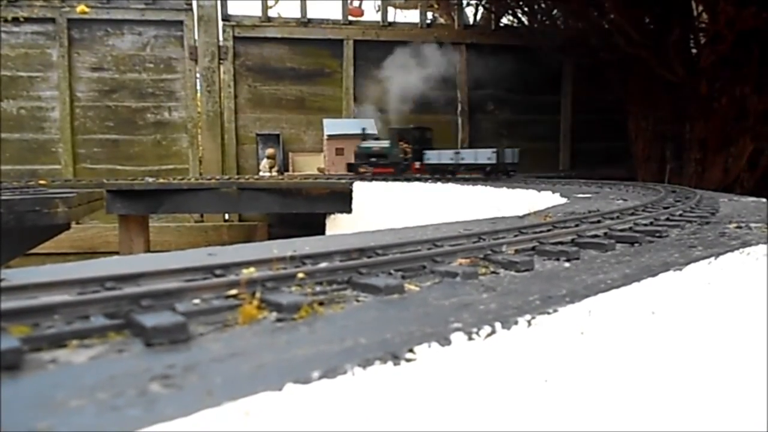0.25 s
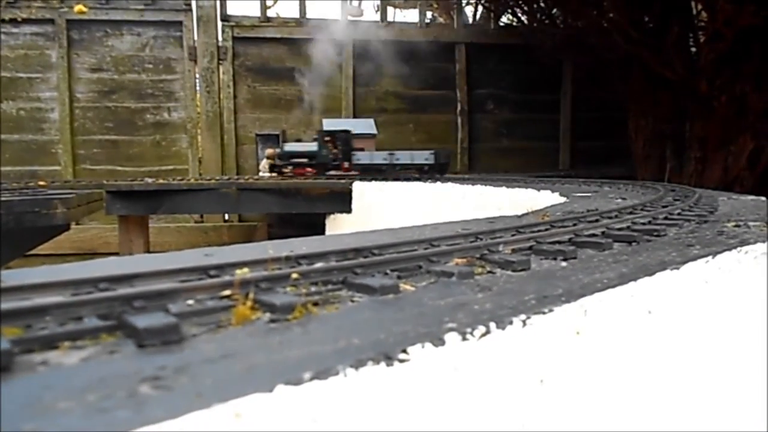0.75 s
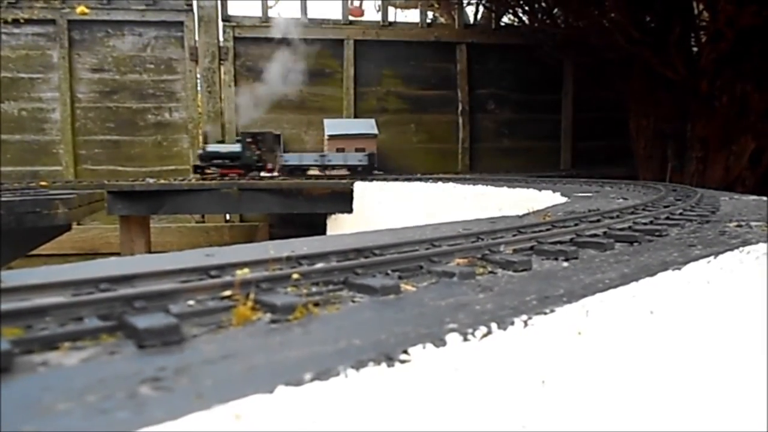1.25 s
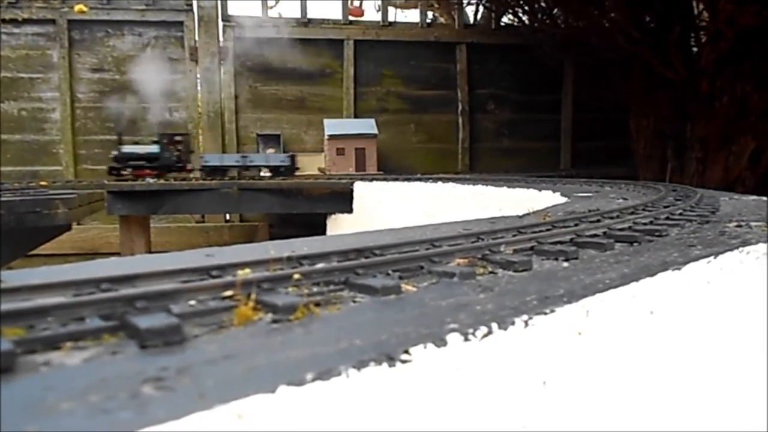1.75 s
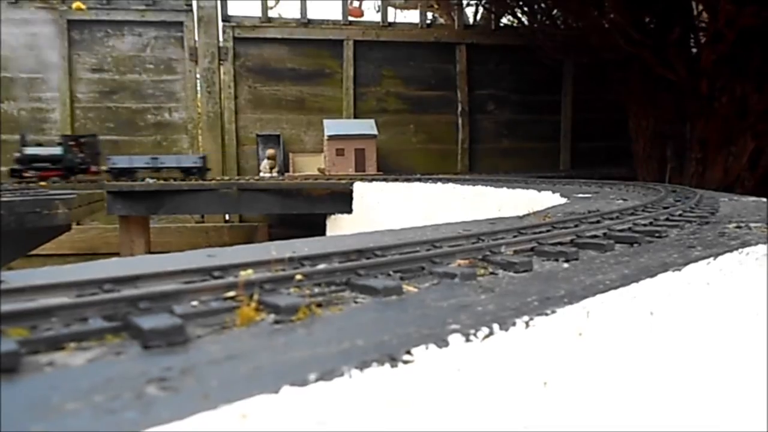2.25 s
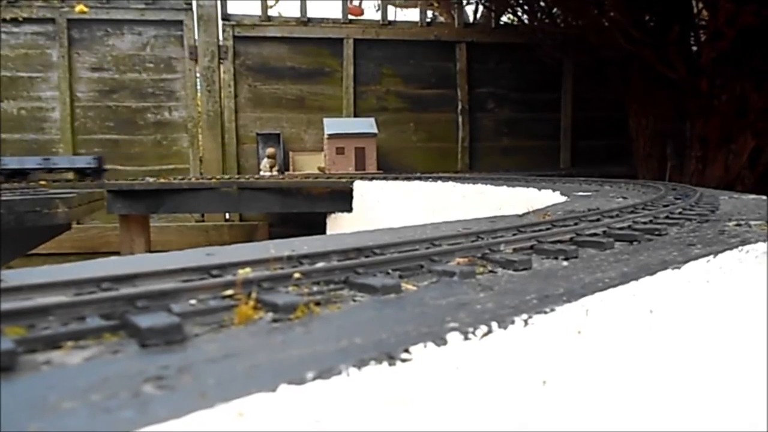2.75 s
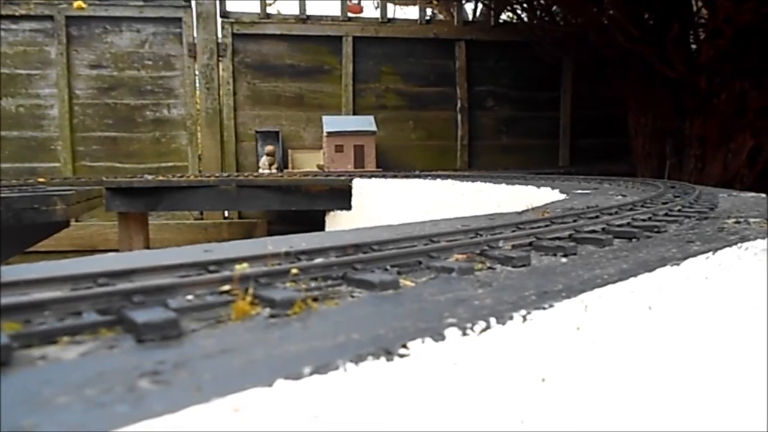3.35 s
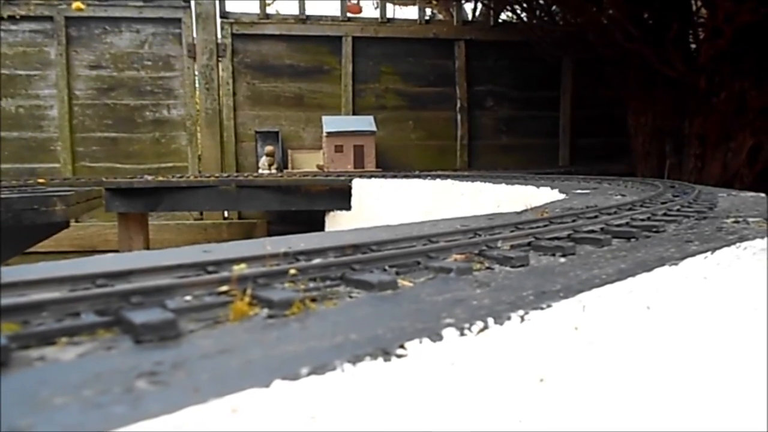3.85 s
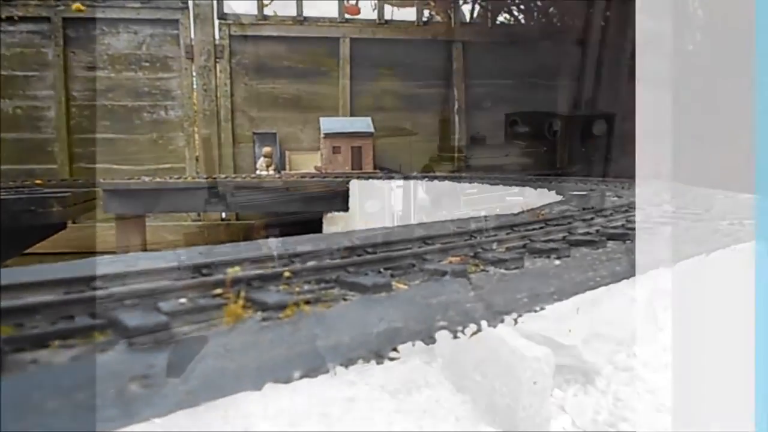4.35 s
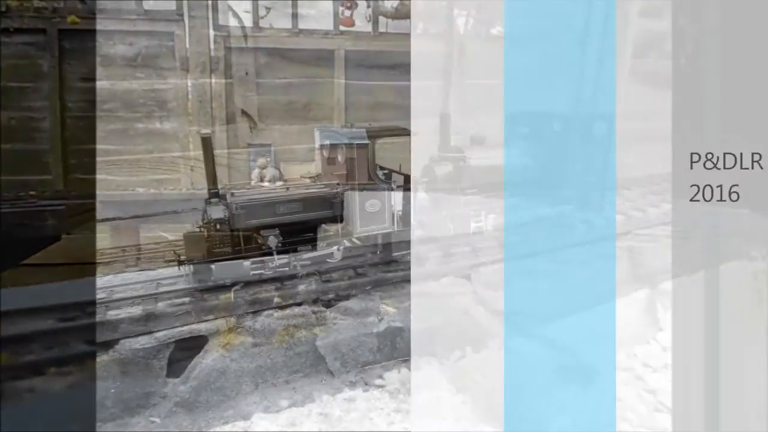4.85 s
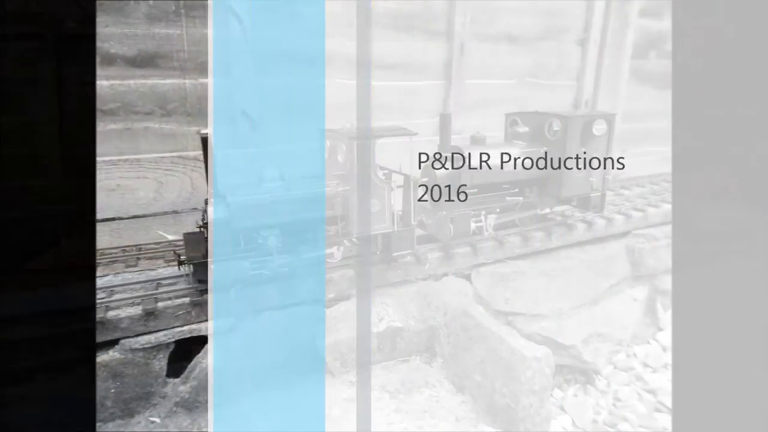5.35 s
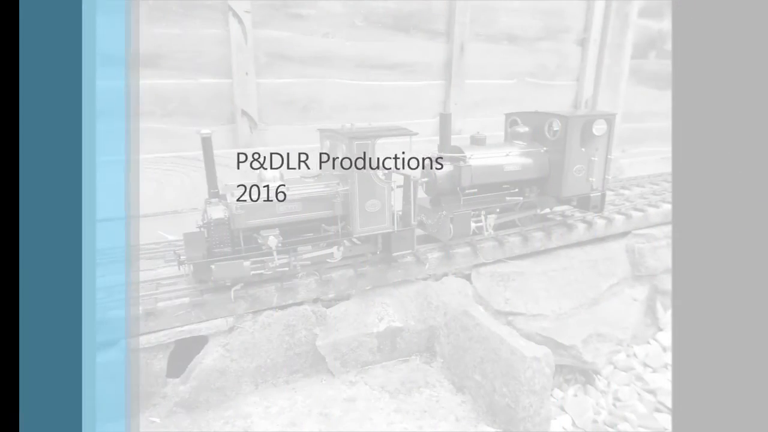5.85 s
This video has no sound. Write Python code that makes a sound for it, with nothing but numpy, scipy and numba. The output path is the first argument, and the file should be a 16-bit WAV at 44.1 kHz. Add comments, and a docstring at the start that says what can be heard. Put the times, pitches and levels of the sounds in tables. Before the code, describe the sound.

A small steam locomotive and wagon run along a garden railway, heard from beside the track as a steady, slightly hollow hiss over rumbling wheels. Hard wind gusts thump on the microphone in the first 0.3 seconds, and the train dips in level, then recovers. Light, regular knocks tick through the first second and return near 1.7 seconds. Softer low buffeting continues, with faint, brief wheel scrapes from about 1 second on. Another gust hits at 2.2 seconds, among a few brighter wheel clicks lasting until 2.7. Strong gusts come between 2.8 and 3.4 seconds, ducking the train again, with a smaller one at 4.2. The rumble then grows as the hiss carries on. A coupling clinks lightly at 4.8 seconds, the wheels drum hollowly at 5.2, and a sharper clink follows at 5.4. Everything stops abruptly at about 5.5 seconds.

```python
"""Hissing steam and rumbling wheels, buffeted by wind, at a microphone beside a garden railway.
A small live-steam locomotive pulls a wagon round: its blast rings the chimney, and the wheels roar
on the baseboard, tick on the track and scrape in the curve. Gusts thump on the microphone;
the train's level dips after the hardest ones, and all sound stops abruptly."""
import sys
import numpy as np
from scipy import signal
from scipy.fft import rfft, irfft, next_fast_len
from scipy.io import wavfile
from scipy.ndimage import uniform_filter1d
from numba import njit

SR = 44100
rng = np.random.default_rng(int(sys.argv[2]) if len(sys.argv) > 2 else 0)


def materialize(psi):
    """Save the field psi as 16-bit PCM at rate SR to the path in sys.argv[1].

    A 1-D psi becomes a single channel; in a 2-D psi each row is a channel.
    """
    bounded = np.clip(np.atleast_2d(psi).T, -1, 1)
    quanta = np.round(bounded * 32767).astype(np.int16)
    wavfile.write(sys.argv[1], SR, quanta)


N = 269449
TIME = np.arange(N) / SR

# gusts at the microphone:
# (time [s], length [s], relative slow swing [dB], relative turbulence [dB], top pitch [Hz])
GUSTS = [(0.049, 0.065, -20, -17, 374), (0.173, 0.045, -15.5, -13, 456), (0.288, 0.085, -26, -24, 200),
         (.78, .18, -30.5, -40, 109), (1.204, 0.097, -18, -31, 100), (1.41, 0.13, -15.5, -28, 100),
         (2.199, 0.084, -14.5, -17, 290), (2.83, 0.21, -14, -33, 119), (2.968, 0.044, -32, -16, 357),
         (3.082, 0.08, -24, -17, 346), (3.205, .008, -25, -24, 435), (3.279, 0.016, -15, -22.5, 590),
         (3.375, 0.056, -25, -22.5, 298), (3.618, 0.058, -23.5, -26, 150), (4.188, 0.13, -19, -18.5, 145)]


def steam(beat_hz=31.1, beat_depth=0.028, flicker_db=1.15, chimney_hz=1154, sag_hz_per_s=19):
    """A hiss with soft exhaust beats, four a wheel turn; the blast rings the chimney and the boiler."""
    # spectrum of the hiss: (frequency [Hz], relative level [dB])
    hiss_spectrum = [(500, -19.5), (1400, 5.5), (2200, 0.5), (3000, -1), (3700, 2), (4500, 5.5),
                     (5300, 4.5), (6100, 2), (7600, 1), (8400, 2), (9100, 2.5), (10100, 4), (10600, -6),
                     (11200, -32)]
    # strength of the blast up the chimney: (time [s], level over the hiss [dB])
    blast = [(0, -6), (.7, 1), (1.1, 3.5), (1.5, -0.5), (2.0, 0.5), (2.8, -1.5), (4.1, -1.5), (5.0, 2.5),
             (5.46, -0.5)]
    # the boiler's hollow note: (pitch [Hz], width [Hz], level relative to the chimney [dB])
    boiler_mode = (430, 65, -6)
    blast_db, = curves(blast)
    beat_count = np.cumsum(beat_hz * (1 + 0.12 * walk(4.1))) / SR
    beats = (1 + beat_depth * np.cos(2 * np.pi * beat_count)) * undb(flicker_db * walk(90))
    sinking_hz = chimney_hz - sag_hz_per_s * TIME
    chimney = even(ring(ring(noise(), sinking_hz, 105), sinking_hz, 400), 0.39)
    hz, width, db = boiler_mode
    boiler = undb(db) * even(resonance(noise(), hz, width), 0.12)
    return beats * (colour(noise(), hiss_spectrum) + undb(blast_db) * (chimney + boiler))


def rolling(rattle_db=0.55):
    """Rough wheels on rough rails: dense tiny impacts that the baseboard turns into a roar."""
    # spectrum of the roar: (frequency [Hz], relative level [dB])
    roar_spectrum = [(60, -8), (190, -0.5), (300, 0.5), (420, 0.5), (500, -0.5), (590, 0.5), (740, -4),
                     (950, -0.5), (1150, -9), (1330, -11), (1880, -13), (2120, -18), (2900, -15),
                     (5000, -23), (10000, -36)]
    # the roar grows as the train comes round: (time [s], level over the hiss [dB])
    roar_levels = [(0, 4.5), (1.3, 6), (2.0, 3.5), (2.4, 6.5), (4.1, 7.5), (5.46, 13)]
    roar_db, = curves(roar_levels)
    contact = grit(9000, 0.72) * undb(rattle_db * walk(70))
    return undb(roar_db) * even(colour(contact, roar_spectrum), 0.1)


def sizzle(s=1.2, length_s=0.24, db=-40, hz=5200, width_hz=330, rise_per_s=0.21):
    """For a moment the hiss takes on a narrow, slightly rising edge."""
    centre_hz = hz * np.exp(rise_per_s * np.clip(TIME - s, -0.5, 0.5))
    return undb(db) * swell(s, length_s) * unit(resonance(noise(), centre_hz, width_hz))


def drumming(s=5.21, length_s=0.12, db=-22.5):
    """The wheels cross a hollow stretch and the baseboard booms."""
    # low modes of the board: (pitch [Hz], width [Hz], relative level [dB])
    board_modes = [(305, 61, -12), (477, 46, -1.5), (594, 54, -2)]
    contact = grit(6700, 0.93)
    boom = sum(undb(mode_db) * resonance(contact, hz, width) for hz, width, mode_db in board_modes)
    return undb(db) * swell(s, length_s) * even(boom, 0.074)


def flanges(rub_db=-44, rub_low_db=-5, waver_db=3):
    """Flanges stick and slip on the outer rail and sing in two broad modes: a rub, and harder scrapes."""
    # scrapes: (time [s], length [s], high mode level [dB], low mode relative to it [dB])
    scrapes = [(1.084, 0.041, -38.5, -21), (1.473, 0.044, -35.5, 0.5), (1.768, 0.048, -31, -8),
               (1.837, 0.071, -35.5, 2), (1.967, 0.011, -35, -1), (2.09, 0.069, -45.5, 1),
               (2.766, 0.06, -36.5, -11), (3.46, 0.016, -31, -12), (4.22, 0.1, -39, 0.5),
               (4.752, 0.073, -32, -9)]
    slip = grit(9000, 1) * undb(3 * walk(100))
    low = even(resonance(slip, hz=3096, width=350), 0.047)
    high = even(resonance(slip, hz=9220, width=1000), 0.047)
    rub = undb(rub_db + waver_db * walk(12)) * (high + undb(rub_low_db) * low)
    return rub + sum(undb(db) * swell(s, length) * (high + undb(low_db) * low)
                     for s, length, db, low_db in scrapes)


def rod_knocks(slowing_per_turn=0.0073):
    """A rod knocks once a turn as the wheels slow in the curve: (time [s], relative peak [dB])."""
    # spells of knocking: (start [s], end [s], turn [s], first relative peak [dB], growth [dB/turn])
    spells = [(.071, .9, .1215, -31, .9), (1.701, 2.03, .1305, -29, -1.7)]
    return [(start + k * turn_s * (1 + slowing_per_turn * k), db + k * growth_db)
            for start, end, turn_s, db, growth_db in spells
            for k in range(int((end - start) / turn_s) + 1)]


def wheel_ticks(decay_s=0.0025, chatter_db=-19, gain_db=-1, single_body_db=-3.5):
    """Each knock rings the wheel with a crack and a faint chatter; the single ticks sound brighter."""
    # single bright wheel ticks, some at rail joints: (time [s], relative peak [dB])
    single_ticks = [(.963, -28), (1.297, -31.5), (2.103, -23), (2.182, -26.5), (2.464, -24), (2.535, -22.5),
                    (2.545, -29.5), (2.684, -31), (4.24, -29.5)]
    # modes of a knocked wheel: (pitch [Hz], width [Hz], relative level [dB])
    wheel_modes = [(1400, 150, -7), (3036, 1100, 4), (4430, 980, 1), (6700, 3700, 2), (7900, 1500, 3)]
    t = TIME[:SR // 8]
    decay = np.exp(-t / decay_s) + undb(chatter_db) * np.exp(-t / (10 * decay_s))
    bright, body = np.zeros(N), np.zeros(N)
    for knocks, body_db in ((rod_knocks(), 0), (single_ticks, single_body_db)):
        for s, db in knocks:
            i = int(s * SR)
            bright[i:i + len(t)] += undb(db) * decay
            body[i:i + len(t)] += undb(db + body_db) * decay
    out = 0
    for hz, width, db in wheel_modes:
        mode = even(ring(ring(noise(), hz, width), hz, width), 0.0028)
        out = out + undb(db + gain_db) * mode * (body if hz < SR / 8 else bright)
    return out


def couplings(decay_s=0.0057):
    """A loose coupling snatches and rings briefly."""
    # clinks: (time [s], peak [dB], pitch [Hz])
    clinks = [(4.757, -23, 1937), (5.391, -13, 1310)]
    out = 0
    for s, db, hz in clinks:
        age = np.maximum(TIME - s, 0)
        out = out + undb(db) * np.sin(2 * np.pi * hz * age) * np.exp(-age / decay_s)
    return out


def add_reflection(x, share=0.11):
    """A weak late copy off a nearby surface combs the treble; the comb rises as the lag shrinks."""
    # the reflection closes in as the train moves: (time [s], lag [ms])
    lags = [(0, 1.96), (1.9, 2.06), (2.85, 1.6), (4.1, 1.62), (5.46, 1.64)]
    lag_ms, = curves(lags)
    treble = signal.sosfilt(signal.butter(1, 900, "high", fs=SR, output="sos"), x)
    return x + share * np.interp(TIME - lag_ms / 1000, TIME, treble)


def dip_gain(fall_db_per_s=208, recover_db_per_s=18):
    """The train's level falls fast, holds, and recovers steadily; the deepest dip counts."""
    # dips, placed after the hardest gusts: (start [s], depth [dB], time until recovery [s])
    dips = [(-.05, 7, 0.51), (0.159, 13.5, 0.2), (1.487, 6, 0.17), (2.19, 4.5, 0.12), (2.877, 12.5, 0.56)]
    deepest_db = 0
    for s, depth_db, hold_s in dips:
        falling = (TIME - s) * fall_db_per_s
        recovering = depth_db - (TIME - s - hold_s) * recover_db_per_s
        deepest_db = np.maximum(deepest_db, np.clip(np.minimum(falling, recovering), 0, depth_db))
    return undb(-deepest_db)


def wind(gain_db=-1, flutter_db=2, fall_db_per_s=0.76):
    """Slow pressure swings on the microphone: a fluttering, dying breeze that swells with each gust."""
    # spectrum of the buffeting: (frequency [Hz], relative level [dB])
    buffet_spectrum = [(6, -9), (22, 1), (45, -1), (80, -7.5), (130, -12), (250, -21.5), (600, -47.5),
                       (2000, -69.5)]
    breeze = undb(-24.5 - fall_db_per_s * TIME + flutter_db * walk(16))
    gust_power = sum((undb(db) * swell(s, length)) ** 2 for s, length, db, _, _ in GUSTS)
    swings = even(colour(noise(), buffet_spectrum), 0.11)
    return undb(gain_db) * np.sqrt(breeze ** 2 + gust_power) * swings


def turbulence(gain_db=-1.5, ragged_db=3, flutter_db=2):
    """A gust tears into ragged whirls; the sound falls away above the pitch of the smallest."""
    whirls = noise() * undb(ragged_db * walk(150))
    out = 0
    for s, length, _, db, hz in GUSTS:
        tearing = colour(whirls, [(hz / 12, -14), (hz / 3, 0), (hz, -2), (2 * hz, -19), (8 * hz, -62)])
        out = out + undb(db) * swell(s, length) * even(tearing, 0.022)
    return undb(gain_db + flutter_db * walk(110)) * out


def eddies(width_cycles=0.44, gain_db=-1):
    """A passing eddy sucks at the microphone: one short swing of pressure."""
    # the strongest eddies: (time [s], relative peak [dB], pitch [Hz])
    hits = [(.034, -10, 480), (.065, -3.5, 370), (0.084, -4.5, 170), (.17, -.5, 427), (.182, -1.5, 330),
            (.191, 4, 450), (.594, -11, 45), (1.145, -8, 50), (1.177, -10.5, 55), (1.362, -6, 40),
            (1.507, -7, 33.7), (1.665, -13, 89), (2.896, -2, 473), (2.929, 2.5, 260), (3.017, -8, 130),
            (3.153, -8.5, 80), (3.273, -6.5, 269)]
    out = 0
    for s, db, hz in hits:
        cycles = (TIME - s) * hz
        out = out - undb(db) * np.cos(2 * np.pi * cycles) * np.exp(-(cycles / width_cycles) ** 2)
    return undb(gain_db) * out


def undb(db):
    """Decibels to gain."""
    return 10 ** (np.asarray(db) / 20)


def unit(x):
    """Scale to rms 1."""
    return x / np.sqrt(np.mean(x ** 2))


def even(x, span_s):
    """Take out swells slower than span_s; rms 1."""
    return unit(x / np.sqrt(uniform_filter1d(x ** 2, int(span_s * SR)) + 1e-9))


def curves(table):
    """Each column after the first, joined by straight lines in time."""
    s, *columns = np.transpose(table)
    return [np.interp(TIME, s, c) for c in columns]


def swell(s, length):
    """A smooth rise and fall around a moment."""
    return np.exp(-2 * ((TIME - s) / length) ** 2)


def noise():
    """White noise."""
    return rng.standard_normal(N)


def walk(rate):
    """Smooth chance that changes about rate times a second; rms 1."""
    hold = int(SR / rate)
    steps = np.repeat(noise()[:N // hold + 1], hold)
    return unit(uniform_filter1d(uniform_filter1d(steps, hold), hold)[:N])


def grit(rate, spread_db):
    """Tiny random impacts, rate a second, most weak and a few strong."""
    impacts = (rng.random(N) < rate / SR) * noise()
    return unit(impacts * undb(spread_db * np.minimum(rng.exponential(size=N), 5)))


def colour(x, points):
    """Shape a sound by (frequency [Hz], level [dB]) points; rms 1."""
    hz, db = np.transpose(points)
    size = next_fast_len(N)
    bin_hz = np.maximum(np.arange(size // 2 + 1) * SR / size, 1)
    gain = undb(np.interp(np.log(bin_hz), np.log(hz), db))
    return unit(irfft(rfft(x, size) * gain, size)[:N])


@njit
def moving_bandpass(x, hz, width):
    """State-variable band-pass with a moving centre."""
    out, band, low = np.empty(len(x)), 0., 0.
    for i in range(len(x)):
        g, damping = np.tan(np.pi * hz[i] / SR), width[i] / hz[i]
        v = (band + g * (x[i] + 1e-18 - low)) / (1 + g * (g + damping))
        out[i] = damping * v
        band, low = 2 * v - band, low + 2 * g * v
    return out


def ring(x, hz, width):
    """One band-pass, gain 1 at its centre; width in Hz."""
    return moving_bandpass(x, hz * np.ones(N), width * np.ones(N))


def resonance(x, hz, width):
    """A ring with its skirts steepened by a second, twice as wide."""
    return ring(ring(x, hz, width), hz, 2 * width)


def scene():
    """The train as heard from beside the rails, and the wind on the microphone."""
    # loudness of steam and rolling along the track: (time [s], level [dB])
    passage = [(0, -29.5), (1.05, -31.5), (1.18, -34), (1.4, -31), (1.9, -31.5), (2.1, -30), (2.35, -29.5),
               (2.8, -31.5), (4.3, -32.5), (5.46, -31.5)]
    passage_db, = curves(passage)
    running = undb(passage_db) * (steam() + rolling())
    train = running + sizzle() + drumming() + flanges() + wheel_ticks() + couplings()
    trackside = dip_gain() * add_reflection(train)
    return (trackside + wind() + turbulence() + eddies())[None]


def record(dry, ceiling=0.88, stop_s=5.489, fade_s=0.014, top_hz=10700):
    """The loudest gusts clip, the sound is switched off, and the top is cut."""
    switch = np.clip((stop_s - TIME) / fade_s, 0, 1)
    clipped = np.clip(dry, -ceiling, ceiling) * switch
    return signal.sosfilt(signal.ellip(8, 0.2, 60, top_hz, fs=SR, output="sos"), clipped)


dry = scene()
out = record(dry)
materialize(out)
```